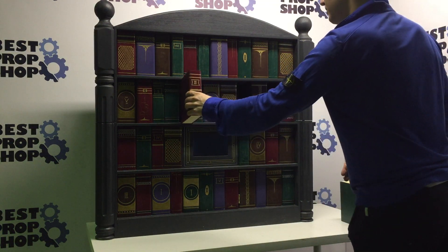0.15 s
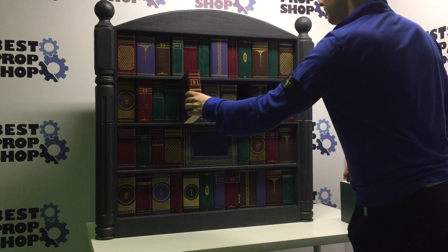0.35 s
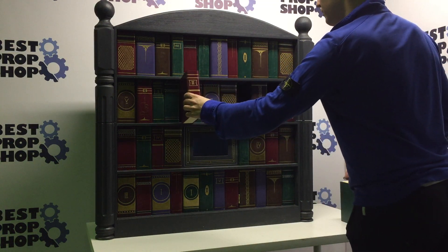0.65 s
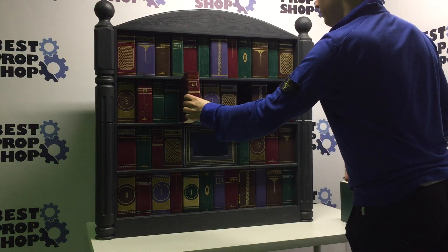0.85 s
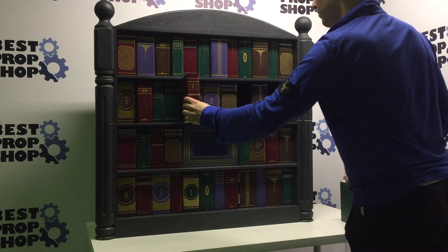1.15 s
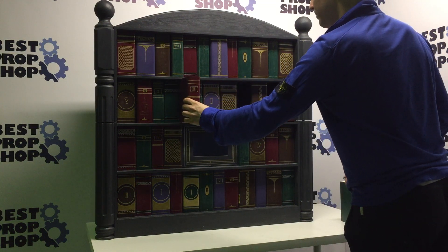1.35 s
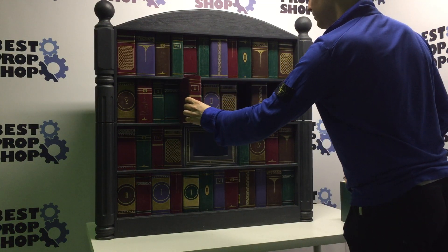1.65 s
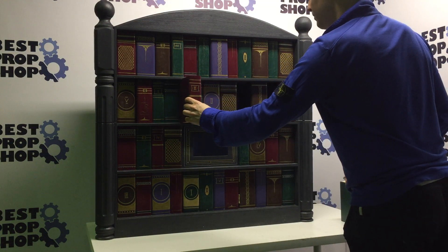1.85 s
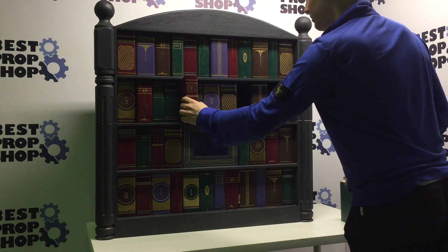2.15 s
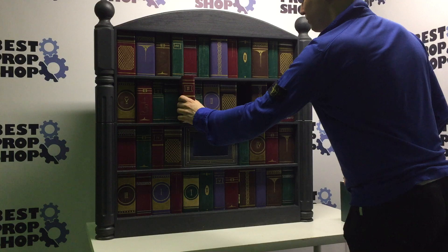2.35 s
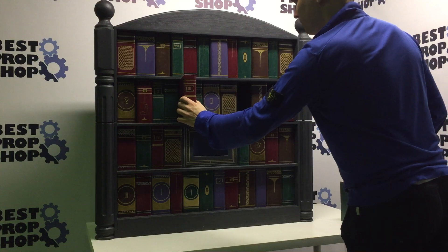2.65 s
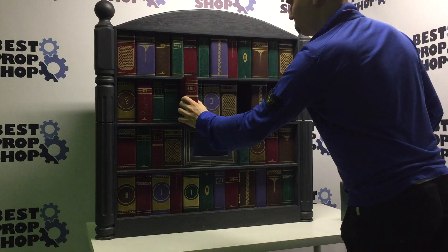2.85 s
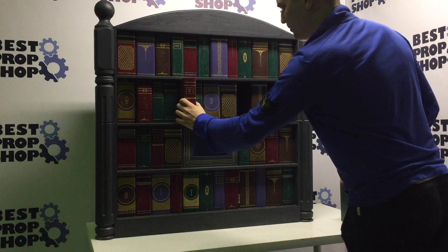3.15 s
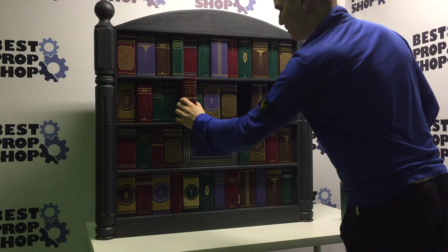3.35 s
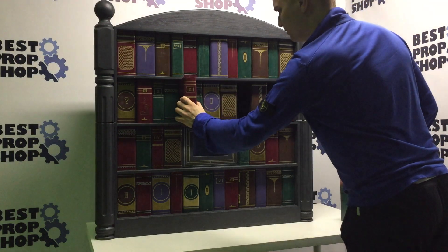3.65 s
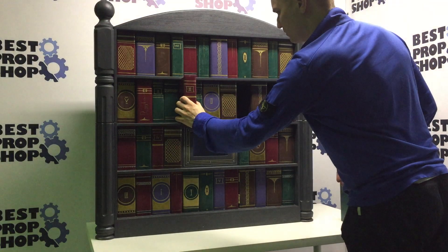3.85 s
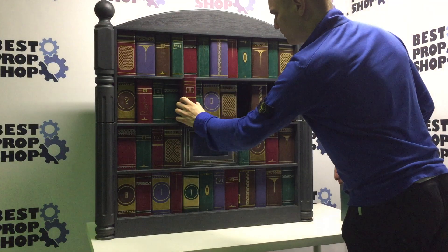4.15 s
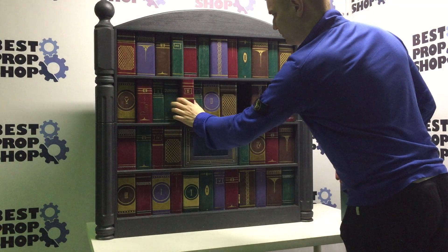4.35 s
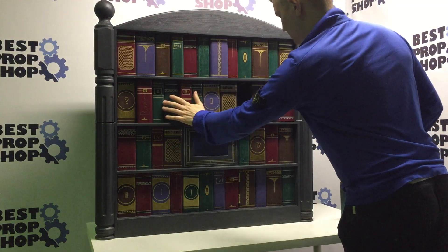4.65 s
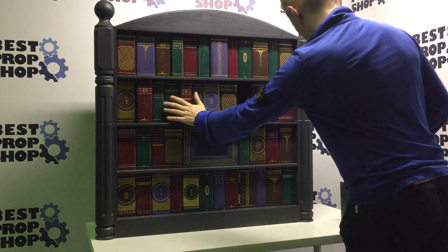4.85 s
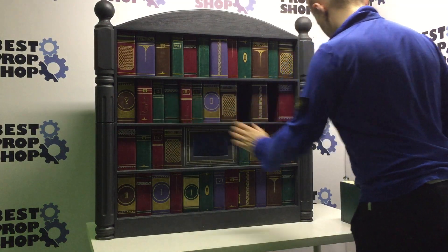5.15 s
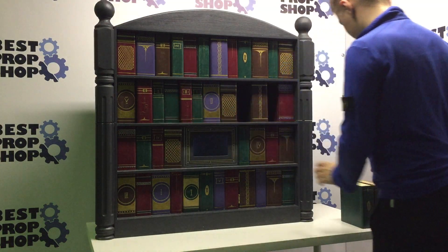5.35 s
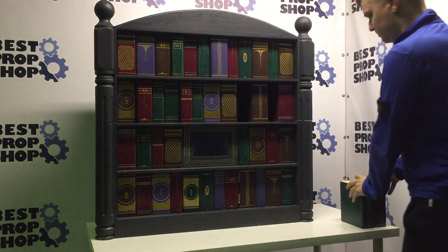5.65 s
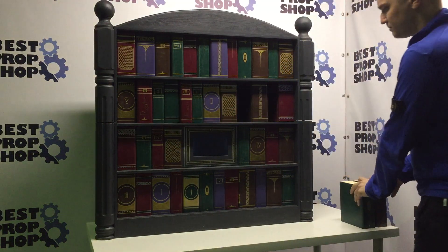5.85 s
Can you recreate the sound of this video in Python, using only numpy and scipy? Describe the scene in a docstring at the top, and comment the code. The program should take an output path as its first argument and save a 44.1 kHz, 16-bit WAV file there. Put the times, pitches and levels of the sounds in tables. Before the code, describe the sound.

A book knocks irregularly against a wooden bookcase and slides into its slot with a scrape, in a bare, echoing room.

```python
"""A bare, echoing room, with one microphone hearing a wooden bookcase directly and off the walls.
Books are tipped, knocked about and slid home. Each knock rings the shelves and the hard book shell;
covers rub and stick on the wood. At the end a sleeve brushes past and a book is swept across the
table beside the case. Faint room tone lies under it all."""
import sys
import numpy as np
from scipy import signal
from scipy.fft import rfft
from scipy.io import wavfile
from scipy.ndimage import uniform_filter1d, minimum_filter1d

SR = 44100
rng = np.random.default_rng(int(sys.argv[2]) if len(sys.argv) > 2 else 0)


def transcribe(u):
    """Save the signal u as a 16-bit wav file named by the first command-line argument.

    u: samples, shape (n,) or (channels, n), limited to [-1, 1]; the rate is SR.
    q: integer samples, one column per channel.
    """
    v = np.clip(np.atleast_2d(u).T, -1, 1)
    q = np.round(v * 32767).astype(np.int16)
    wavfile.write(sys.argv[1], SR, q)


N = 264159
BINS = np.fft.rfftfreq(8192, 1 / SR)  # Hz, the grid for filter curves


def knocks():
    """Each knock is two contacts: the book's edge strikes, then it drops flat and shakes the case."""
    # Each row: start in seconds, thud in dB, contact hardness as a corner in Hz, back panel boom in dB,
    # book ring and edge tick in dB re the thud, tick tilt in dB per octave, seconds until the book
    # settles, settling thud in dB.
    hits = [ (0.152, -24.5, 1850, 1, -11, -13.5, 1.5, .028, -25.5),
            (0.601, -34.5, 492, 3.5, -24.5, -34.5, 1, .035, -45.5),
            (1.405, -33, 820, 0.5, -3, -12, 4, .032, -31),
            (1.587, -41.5, 614, 1.5, -28, -26.5, 0, .029, -44),
            (2.029, -41, 451, 7.5, -1, -26, 3, .033, -48),
            (2.432, -29.5, 1077, -1, 10.5, -2.5, -0.5, .053, -40),
            (3.048, -41.5, 668, -2.5, 17.5, -12, -4, .028, -33),
            (3.110, -44.5, 600, 2, 16, -13, -5.5, .060, -45),
            (3.763, -27, 1766, -5, -7.5, -15.5, 3.5, .014, -28),
            (4.255, -38, 1294, -5.5, -1.5, -13, -5, .055, -37),
            (4.531, -38.5, 904, -1.5, -6.5, -22, -10, 0.033, -42.5),
            (4.712, -35.5, 1160, 1.5, -10.5, -7.5, 4, .016, -31.5),
            (5.778, -45.5, 534, -3, -25, -7.5, -12, 0.017, -54),
            (5.888, -46.5, 1150, -7.5, 2, 1, 6.5, .016, -49)]
    out = np.zeros(N)
    for start, thud_db, corner_hz, boom_db, book_db, tick_db, tilt, delay, settle_db in hits:
        strike = blow(thud_db, corner_hz, boom_db, book_db, tick_db, tilt, case_db=-7.5, t60=0.18)
        add(out, start, strike)
        soft_hz = np.sqrt(corner_hz * 430)  # the flat landing is softer, with less tick
        settle = blow(settle_db, soft_hz, boom_db, book_db, tick_db - 15.5, tilt, case_db=-1.5, t60=0.14)
        add(out, start + delay, settle)
    return out


def blow(thud_db, corner_hz, boom_db, book_db, tick_db, tilt, case_db, t60):
    """One contact: a thud of crowded short modes, a tick at the edge, and the ring of case and book."""
    # Spectra of the thud and of the edge tick. Each row: frequency in Hz, relative level in dB.
    thud_colour = [(28, -58), (45, -32), (72, -9.5), (105, -18), (170, -4), (300, -1.5), (600, 1.5),
                   (1000, -1), (2000, -3.5), (5000, -9.5), (16000, -17.5)]
    tick_colour = [(200, -17), (1000, -6.5), (2000, 6.5), (2900, 0.5), (3500, -7), (4500, -11),
                   (7000, -20.5), (9300, -28), (10700, -35), (15000, -37)]
    # Modes of the shelves and back panel, and of the hard book shell.
    # Each row: frequency in Hz, relative level in dB, seconds to fall 60 dB.
    case_modes = [(80.3, -19, 0.15), (127, -13.5, 0.52), (153.1, -8.5, 0.33), (177.15, -8.5, 0.35),
                  (211.2, -20, 0.29), (295.8, -3, 0.11), (322, 0.5, 0.16), (387.4, -1.5, 0.13),
                  (517, -7.5, 0.1), (694, -2.5, 0.14), (1214, -5.5, .12), (1313, 2.5, 0.089)]
    book_modes = [(743, -1.5, 0.03), (897, -9, 0.021), (948.4, -6.5, 0.075), (1003, -4.5, 0.073),
                  (1041, -11.5, 0.2), (1510, -11, 0.1), (1520, -3, 0.037), (1623.4, -4.5, 0.055),
                  (2150, -25, 0.054), (2314, -27, .04), (2563, -16, 0.018), (2750, -7.5, 0.043),
                  (2963, -2.5, 0.036)]
    t = np.arange(SR // 2) / SR
    crowd, edge = rng.choice([-1., 1.], (2, len(t)))
    crowd = level_out(crowd * fade(t, t60) * (1 - np.exp(-t * corner_hz / 1.4)), width_hz=110)
    thud = colour(crowd, read(thud_colour) + contact_db(BINS, corner_hz) + boom_db * panel_share(BINS))
    edge = level_out(edge * fade(t, t60=0.063) * (1 - np.exp(-t / 0.0017)), width_hz=500)
    treble_octaves = np.log2(np.maximum(BINS / 2000, 1))
    tick = colour(edge, read(tick_colour) + tilt * treble_octaves)
    booming_modes = [(hz, db + boom_db * panel_share(hz), decay) for hz, db, decay in case_modes]
    case = ring(booming_modes, t, corner_hz, rise_cycles=3.6)
    shell_hz = min(corner_hz ** 2 / 600, 2200)  # only sharp blows reach the shell's upper modes
    book = ring(book_modes, t, shell_hz, rise_cycles=0.99)
    return amp(thud_db) * (thud + amp(tick_db) * tick + amp(case_db) * case + amp(book_db) * book)


def ring(modes, t, corner_hz, rise_cycles):
    """Damped modes that swell over a few cycles, so the low ones bloom last."""
    out = np.zeros(len(t))
    for hz, db, t60 in modes:
        envelope = fade(t, t60) * (1 - np.exp(-t * hz / rise_cycles))
        tone = np.sin(2 * np.pi * (hz * t + rng.random()))
        out += amp(db + contact_db(hz, corner_hz)) * envelope * tone
    return out


def contact_db(hz, corner_hz, steepness=3.3):
    """A soft contact lasts longer and excites little above its corner."""
    return -10 * np.log10(1 + (hz / corner_hz) ** (2 * steepness))


def panel_share(hz, boom_hz=220):
    """How much of the sound at hz comes from the back panel, from 1 in the bass to 0."""
    return 1 / (1 + (hz / boom_hz) ** 6)


def chatters_and_crack():
    """Short, unsteady tones: covers stick and slip on the wood, and a book's hard shell cracks once."""
    # Each row: start in seconds, length in seconds, pitch in Hz, level in dB, jitter as a share of pitch.
    # The row at 0.151 s is the sharp 1.6 kHz crack of the book's hard shell on the first knock.
    bursts = [ (0.0, .073, 348.6, -55, 0.38), (0.151, .015, 1590, -27, 0.096),
              (1.135, 0.048, 146.4, -55, .24), (1.314, .037, 1333, -64, .07),
              (2.218, 0.032, 833, -61.5, 0.089), (2.345, 0.051, 567, -43, .22), (3.45, .02, 897, -52, .04),
              (3.47, 0.031, 175, -55.5, 0.13), (4.097, .067, 379, -47.5, .15),
              (4.158, 0.072, 159, -46, 0.14), (4.308, 0.043, 381, -31.5, 0.045),
              (4.41, 0.081, 172, -46, 0.093), (4.54, 0.072, 181, -42, .05),
              (4.718, 0.09, 285.2, -42.5, .18), (5.784, 0.04, 172, -43.5, 0.055),
              (5.887, 0.031, 2050, -45, .1)]
    out = np.zeros(N)
    for start, length, hz, db, jitter in bursts:
        wander = unit(uniform_filter1d(rng.standard_normal(SR // 4), size=90))[:int(length * SR)]
        phase = 2 * np.pi * np.cumsum(hz * (1 + jitter * wander)) / SR
        tone = np.sin(phase) + amp(-20) * np.sin(2 * phase)
        add(out, start, amp(db) * unit(tone) * signal.windows.tukey(len(tone), .5))
    return out


def push():
    """A book slides home, slowing: its foot rumbles on the shelf and its cloth cover hisses."""
    # Extra shoves along the way. Each row: peak time in seconds, level in dB.
    shove_peaks = [(4.101, -48.5), (4.335, -41.5), (4.538, -43.5)]
    # Spectra of the foot and of the cloth. Each row: frequency in Hz, relative level in dB.
    foot_colour = [(30, -45), (60, -19.5), (135, -12), (172, -5.5), (215, -7.5), (260, -13), (375, -5.5),
                   (440, -16), (690, -11), (790, -17.5), (960, -17), (1100, -20), (1600, -22),
                   (2600, -36.5), (8000, -62.5)]
    cloth_colour = [(600, -4.5), (1500, 8.5), (3000, 3.5), (4700, -4.5), (6500, -6), (7500, -16),
                    (9300, -14.5), (10700, -28.5), (15000, -23)]
    at_s, hold_s, lead_s = 4.275, 0.49, 0.074  # the cloth grips its neighbours a little earlier
    slide = stroke(at_s, db=-44, rise=90, fall=220, hold_s=hold_s, drift=-17)
    shoves = sum(stroke(s, db, rise=193, fall=130.5) for s, db in shove_peaks)
    cloth = stroke(at_s - lead_s, db=-60.5, rise=269, fall=220, hold_s=hold_s + lead_s, drift=-10)
    rumble = rub(np.hypot(slide, shoves), foot_colour, catches_per_s=600, catch_share=0.17)
    hiss = rub(cloth, cloth_colour, catches_per_s=4300, catch_share=0.15)
    return rumble + hiss


def scuffs():
    """A cover rubs lightly on its neighbours as the book tips."""
    # Each row: peak time in seconds, level in dB, rise in dB per second.
    scuff_peaks = [(0.15, -52, 548.5), (1.40, -52.5, 130.5), (1.60, -65.5, 225), (2.06, -61, 399),
                   (2.34, -60, 110), (3.101, -55, 129), (3.25, -57.5, 171), (3.47, -61, 399.5)]
    # Spectrum of cover on cover. Each row: frequency in Hz, relative level in dB.
    scuff_colour = [(60, -11), (180, 6.5), (600, 5.5), (1300, -2.5), (3000, -14.5), (6000, -25),
                    (10000, -42), (15000, -40.5)]
    level = sum(stroke(s, db, rise, fall=243) for s, db, rise in scuff_peaks)
    return rub(level, scuff_colour, catches_per_s=310, catch_share=0.19)


def swishes():
    """A sleeve brushes past, then a book sweeps across the table, gathers speed and stops short."""
    # Brushes of the sleeve. Each row: peak time in seconds, level in dB.
    brushes = [(5.055, -68), (5.24, -67)]
    # Spectrum of sleeve and sweep alike. Each row: frequency in Hz, relative level in dB.
    swish_colour = [(100, -16.5), (500, -5), (1500, -6.5), (2800, -5.5), (4200, -7), (6000, -8.5),
                    (8500, -11.5), (10500, -16), (13000, -16.5), (15500, -20.5)]
    sleeve = sum(stroke(s, db, rise=240.5, fall=329) for s, db in brushes)
    sweep = stroke(5.78, db=-57.5, rise=220, fall=477, hold_s=0.13, drift=60)
    return rub(sleeve + sweep, swish_colour, catches_per_s=1400, catch_share=0.18)


def stroke(s, db, rise, fall, hold_s=0, drift=0):
    """Gain of a hand movement: rises to db at time s, drifts while held, falls (slopes in dB per s)."""
    t = np.arange(N) / SR - s
    return amp(db + rise * np.minimum(t, 0) + drift * np.clip(t, 0, hold_s)
               - fall * np.maximum(t - hold_s, 0))


def rub(level, spectrum, catches_per_s, catch_share):
    """Friction: a smooth hiss of fibres and sparse larger catches, following the level of the stroke."""
    catches = rng.standard_normal(N) * (rng.random(N) < catches_per_s / SR)
    force = np.sqrt(catch_share) * unit(catches) + np.sqrt(1 - catch_share) * rng.standard_normal(N)
    return colour(level * force, read(spectrum))


def room(x, tails=3):
    """Book and body move, so the echoes at the microphone drift from one tail to the next."""
    turn = np.pi * np.arange(N) / SR * 1.3
    weights = [np.sqrt(2 / tails) * np.cos(turn + np.pi * k / tails) for k in range(tails)]
    return sum(signal.fftconvolve(x * w, room_tail())[:N] for w in weights)


def room_tail(build_up_s=0.0033):
    """Diffuse echo of bare walls: it builds quickly, and the middle outlasts treble and deep bass."""
    # Decay of the room. Each row: frequency in Hz, seconds to fall 60 dB.
    decay_times = [(80, 0.12), (170, 1.12), (400, 1.27), (1000, 1.35), (1700, 1.41), (2800, 1.2),
                   (4500, 0.27), (9000, .3)]
    # Strength of the echo, with its low standing waves. Each row: frequency in Hz, gain in dB.
    echo_gain = [(55, -17), (77, 3), (102, -5.5), (130, -4), (175, 1.5), (215, 2.5), (255, -2), (300, -4),
                 (400, -5), (1000, -3.5), (1600, -8), (2500, -5), (4500, -7.5), (10000, -10.5)]
    hz, t, bands = signal.stft(rng.standard_normal(SR * 7 // 5), SR, nperseg=512)
    bands = bands * fade(t, read(decay_times, hz)[:, None]) * (1 - np.exp(-(t / build_up_s) ** 2))
    tail = level_out(signal.istft(bands, SR)[1], width_hz=22)
    gain_db = read(echo_gain)
    return colour(tail / np.linalg.norm(tail), gain_db) * np.sqrt(np.mean(amp(gain_db) ** 2))


def room_tone(level_db=-67.5):
    """The steady, faint background of the room, mostly bass."""
    # Each row: frequency in Hz, relative level in dB.
    air_colour = [(20, -49), (35, -8), (55, -5), (80, 1.5), (130, -3), (200, -7), (400, -7.5), (700, -16),
                  (1200, -20), (2300, -20.5), (5000, -24.5), (9000, -28), (10500, -31.5), (12000, -29),
                  (15500, -34.5)]
    return amp(level_db) * unit(colour(rng.standard_normal(N + SR), read(air_colour))[SR:])


def suppress(x, depth_db=4.0, knee_db=15, softness_db=3.5):
    """Noise suppressor: turns down whatever lies close above the quiet floor of its band."""
    bands = signal.stft(x, SR, nperseg=1024, noverlap=768)[2]
    power = uniform_filter1d(uniform_filter1d(abs(bands) ** 2, size=5, axis=-2), size=3, axis=-1)
    level_db = 10 * np.log10(abs(power) + 1e-20)
    excess_db = level_db - np.percentile(level_db, 15, axis=-1, keepdims=True)
    cut = .5 * (0.5 - np.tanh((excess_db - knee_db) / (2 * softness_db)))  # below 0 it lifts loud parts
    return signal.istft(bands * amp(-depth_db * cut), SR, nperseg=1024, noverlap=768)[1][:, :N]


def limit(x, ceiling_db=-15.0):
    """Peak limiter: ducks for a few milliseconds around peaks over the ceiling."""
    gain = amp(ceiling_db) / np.maximum(abs(x), amp(ceiling_db))
    return x * uniform_filter1d(minimum_filter1d(gain, size=260), size=220)


def amp(db):
    """Decibels to gain."""
    return 10 ** (np.asarray(db) / 20)


def unit(x):
    """Scales to an rms of one."""
    return x / np.sqrt(np.mean(x ** 2) + 1e-20)


def read(points, hz=BINS):
    """Reads a (Hz, value) table on a log-frequency axis."""
    f, value = np.transpose(points)
    return np.interp(np.log(hz + 1), np.log(f), value)


def fade(t, t60):
    """Exponential decay of 60 dB in t60 seconds."""
    return np.exp(-np.log(1000) * t / np.maximum(t60, 1e-3))


def add(mix, s, sound):
    """Mixes a sound in at time s."""
    part = mix[max(round(s * SR), 0):][:len(sound)]
    part += sound[:len(part)]


def colour(x, db):
    """Causal filter of unit energy, shaped by a dB curve over BINS."""
    log_gain = np.log(amp(np.maximum(db, db.max() - 100)))
    mirrored = np.concatenate([log_gain, log_gain[-2:0:-1]])
    minimum_phase = np.exp(np.conj(signal.hilbert(mirrored)))
    taps = np.fft.ifft(minimum_phase).real[:len(db)]
    return signal.oaconvolve(x, taps / np.linalg.norm(taps))[:len(x)]


def level_out(x, width_hz, oversample=8):
    """Evens out chance peaks and gaps wider than width_hz in a random burst, keeping its energy."""
    power = abs(rfft(x, 2 * oversample * (len(BINS) - 1))) ** 2
    smooth = uniform_filter1d(power, size=max(int(oversample * width_hz / BINS[1]), 1))[::oversample]
    even = colour(x, -10 * np.log10(abs(smooth) + 1e-20))
    return even * np.linalg.norm(x) / np.linalg.norm(even)


def scene():
    """At the microphone, in mono: direct knocks and rubbing, their echo off the walls, and room tone."""
    direct = knocks() + chatters_and_crack() + push() + scuffs() + swishes()
    return (direct + room(direct) + room_tone())[None]


def record(dry):
    """A mild noise suppressor and a limiter after the microphone; the sound is then high-passed at 32 Hz, and
    the treble ends at 15.7 kHz."""
    low_cut = signal.butter(2, 32, "highpass", fs=SR, output="sos")
    high_cut = signal.firwin(511, 15700, window=("kaiser", 9), fs=SR)
    heard = signal.sosfilt(low_cut, limit(suppress(dry)))
    return signal.oaconvolve(heard, high_cut[None], "same")


dry = scene()
out = record(dry)
transcribe(out)
```